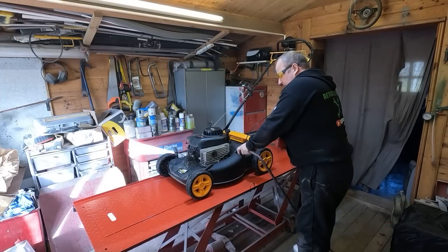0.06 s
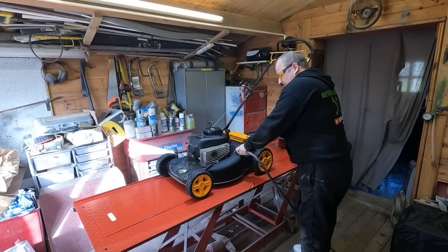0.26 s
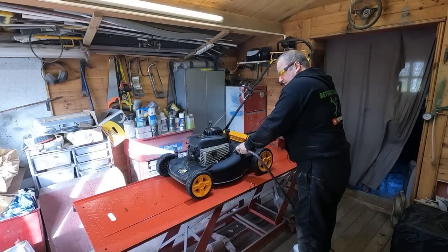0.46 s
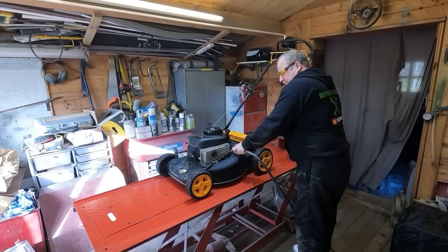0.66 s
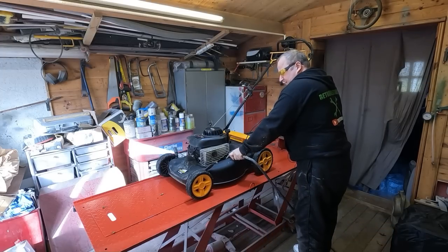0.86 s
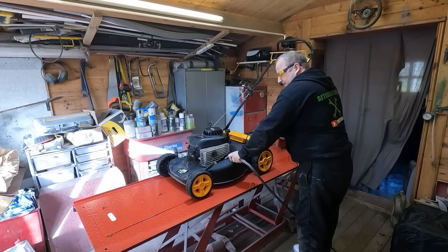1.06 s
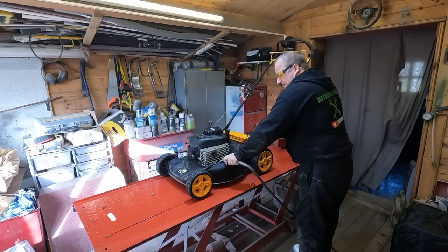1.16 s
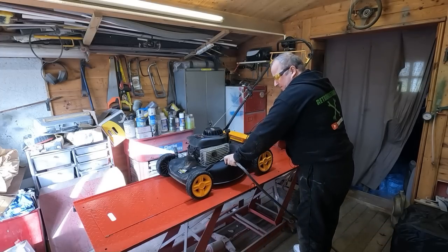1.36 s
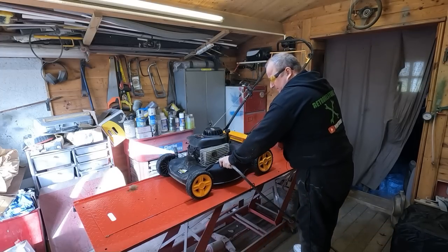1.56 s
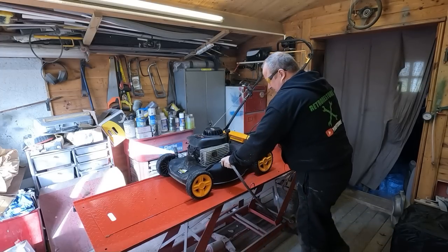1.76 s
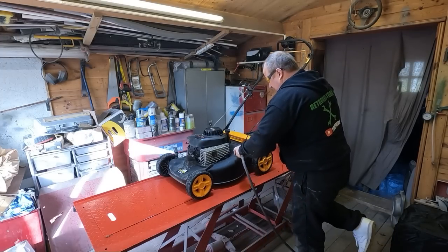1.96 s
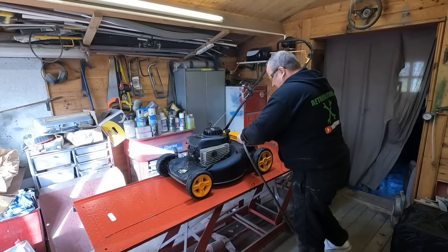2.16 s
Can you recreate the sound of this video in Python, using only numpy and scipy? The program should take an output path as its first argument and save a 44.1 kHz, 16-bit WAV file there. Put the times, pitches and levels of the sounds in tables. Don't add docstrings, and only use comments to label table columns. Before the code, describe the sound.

A compressed-air blow gun in a small wooden workshop, heard from a few metres, nearly mono. Faint room air and a tiny knock, then at 0.2 s a bright hiss bursts open, duller from about 0.7 s, with breathy whistling edges. The nozzle knocks sheet steel sharply near 0.85, 1.08, 1.32 and 1.75 s, scraping between. The blast stops around 1.87 s, leaving a soft fluttering whistle and low hum.

```python
import sys
import numpy as np
from scipy import signal
from scipy.fft import rfft, irfft, next_fast_len
from scipy.io import wavfile
from scipy.ndimage import uniform_filter1d, map_coordinates

SR = 44100
rng = np.random.default_rng(int(sys.argv[2]) if len(sys.argv) > 2 else 0)


def pcm_store(signal):
    levels = np.round(np.clip(np.atleast_2d(signal), -1, 1) * 32767)
    wavfile.write(sys.argv[1], SR, levels.astype(np.int16).T)


def to_linear_factor(level_db):
    exponent = np.asarray(level_db, float) / 20
    return 10 ** exponent


N = 97020


def unit(x):
    return x / np.sqrt(np.mean(x ** 2) + 1e-20)


def along(points, hz):
    f, v = np.transpose(points)
    return np.interp(np.log(hz + 1), np.log(f + 1), v)


def curves(rows):
    s, *cols = np.transpose(rows)
    return [np.interp(np.arange(N) / SR, s, c) for c in cols]


def wobble(rate_hz):
    knots = rng.standard_normal(int(N * rate_hz / SR) + 4)
    return map_coordinates(knots, [np.arange(N) * rate_hz / SR])


def filtered(x, response):
    m = next_fast_len(N + SR // 2)
    return irfft(rfft(x, m) * response(np.fft.rfftfreq(m, 1 / SR)), m)[..., :N]


def resonances(peaks):
    def response(f):
        return sum((-1) ** k * to_linear_factor(db) * 1j * f * w / (c * c - f * f + 1j * f * w)
                   for k, (c, w, db) in enumerate(peaks))
    return response


def patchy(patchy_db, x=None, bins=5, frames=12):
    z = signal.stft(rng.standard_normal(N) if x is None else x, nperseg=512)[2]
    field = uniform_filter1d(rng.standard_normal(z.shape), bins, 0)
    field = uniform_filter1d(field, frames, 1)
    return signal.istft(z * to_linear_factor(patchy_db * unit(field)), nperseg=512)[1][:N]


def whistle(hz, width_hz):
    a, b = filtered(rng.standard_normal((2, N)), lambda f: 1 / (1 + (2 * f / width_hz) ** 2))
    phase = 2 * np.pi * np.cumsum(hz * np.ones(N)) / SR
    return unit(a * np.cos(phase) + b * np.sin(phase))


def room_tone():
    # frequency in Hz, density in dB per Hz
    air_spectrum = [(25, -21), (100, -13.5), (500, -12.5), (2100, -16), (4000, -18.5), (5200, -33),
                    (8600, -23.5), (11500, -39)]
    air_db, hum_hz, hum_width_hz = -52.5, 214, 15
    hum_db, hum_rest_db, hum_on_s, hum_off_s = -57, -9, 0.205, 2.08
    air = unit(filtered(patchy(patchy_db=2.5), lambda f: to_linear_factor(along(air_spectrum, f))))
    drone_db, = curves([(hum_on_s - 0.03, hum_rest_db), (hum_on_s, 0),
                        (hum_off_s, 0), (hum_off_s + 0.05, hum_rest_db)])
    hum = unit(filtered(rng.standard_normal(N), resonances([(hum_hz, hum_width_hz, 0)])))
    return to_linear_factor(air_db) * air + to_linear_factor(hum_db + drone_db) * hum


def walls(x):
    # frequency in Hz, t60 in s
    decay = [(200, 0.39), (2000, 0.38), (10000, 0.13)]
    delay = 350
    out, hop = np.zeros(N + 2 * SR), SR // 5
    padded = np.pad(x, (hop, 2 * hop))
    for start in range(-hop, N, hop):
        hz, t, z = signal.stft(rng.standard_normal(SR // 2), SR, nperseg=256)
        tail = signal.istft(z * to_linear_factor(-60 * t / along(decay, hz)[:, None]), SR, nperseg=256)[1]
        piece = padded[start + hop:][:2 * hop] * np.hanning(2 * hop)
        echo = signal.fftconvolve(piece, tail / np.linalg.norm(tail))
        out[start + hop + delay:][:len(echo)] += echo
    return out[hop:][:N]


def drags():
    # start in s, length in s, level in dB
    strokes = [
        (0.652, 0.2, -42.5),
        (1.099, 0.17, -35),
        (1.418, 0.27, -31.5),
        (1.75, 0.13, -38),
    ]
    # frequency in Hz, width in Hz, level in dB
    panel = [(530, 75, -7), (822, 133, -0.5), (1104, 130, 3), (1387, 120, -4.5), (2010, 260, -5.5),
             (3000, 1000, -11.5)]
    rise_s, fall_s, grains_per_s, grain_spread_db = 0.023, 0.035, 2500, 1.5
    t = np.arange(N) / SR
    hits = rng.random(N) < grains_per_s / SR
    grains = hits * rng.uniform(-0.82, 1, N) * to_linear_factor(grain_spread_db * rng.standard_normal(N))
    stroke = sum(to_linear_factor(db) * np.clip((t - s) / rise_s, 0, 1) * np.clip((s + length - t) / fall_s, 0, 1)
                 for s, length, db in strokes)
    return stroke * to_linear_factor(0.95 * wobble(20)) * unit(filtered(grains, resonances(panel)))


def knocks():
    # start in s, peak in dB, blow frequency in Hz, blow t60 in s
    bumps = [(.001, -40, 808, 0.026), (.006, -40, 520, 0.032), (.014, -41, 750, 0.028),
             (.024, -42.5, 423, .03), (.848, -12.5, 643, 0.017), (.853, -28, 530, 0.018),
             (.860, -22.5, 1250, 0.025), (.864, -25, 560, 0.016), (.877, -27, 780, .03),
             (.898, -27, 790, .015), (1.0775, -22, 597, 0.023), (1.0857, -19.5, 1150, .016),
             (1.096, -31, 1056, 0.042), (1.111, -28, 930, 0.011), (1.3214, -17.5, 746, 0.015),
             (1.3294, -20.5, 1117, 0.021), (1.343, -23, 1037, 0.017), (1.3475, -24, 906, 0.019),
             (1.352, -34, 524, .015), (1.428, -29, 1130, 0.022), (1.749, -23, 645, 0.019),
             (1.757, -25.5, 1057, 0.024), (1.717, -28, 2250, .015)]
    # frequency in Hz, width in Hz, level in dB
    deck = [(433, 710, -2.5), (560, 38, 7.5), (810, 1100, -7.5), (1100, 560, 0.5), (1250, 100, 1.5),
            (2230, 1800, -9.5), (5000, 2000, -11.5)]
    rattle_db, rattle_t60_s, contact_s = -13.5, 0.11, 0.0016
    crack_db, crack_t60_s = -13.5, 0.018
    deck_low_hz = 322
    out, t = np.zeros(N + SR), np.arange(SR // 4) / SR
    shake = unit(filtered(rng.standard_normal(N), resonances(deck)))
    snap = unit(filtered(rng.standard_normal(N), resonances([(2300, 1500, 0), (5000, 2500, -4)])))
    for s, db, hz, t60_s in bumps:
        at = round(s * SR)
        cycles = sum(gain * np.sin(2 * np.pi * ratio * hz * t)
                     for ratio, gain in ((1, 1), (0.818, 0.59), (1.395, 0.44)))
        blow = -2.4 * to_linear_factor(-60 * t / t60_s) * cycles
        crack = to_linear_factor(crack_db - 60 * t / crack_t60_s) * np.roll(snap, -at)[:len(t)]
        rattle = to_linear_factor(rattle_db - 60 * t / rattle_t60_s) * np.roll(shake, -at)[:len(t)]
        onset = 1 - np.exp(-t / contact_s)
        out[at:][:len(t)] += to_linear_factor(db) * ((blow + rattle) * onset + crack)
    return filtered(out[:N], lambda f: (1j * f / (deck_low_hz + 1j * f)) ** 2)


def leak():
    # time in s, level in dB, whistle dropping to the gun body 0-1, lowest tube mode in dB
    flow = [(1.84, -70, 0.1, 3), (1.875, -46.5, 0, 2), (1.945, -43.5, 0.15, 6.5), (1.99, -50, 0.08, 2),
            (2.02, -43, 0.35, -20), (2.045, -45, 0.3, 0), (2.1, -44, 0.55, 3), (2.135, -41.5, 0.85, -1.5),
            (2.2, -45.5, 0.85, -1.5)]
    # frequency in Hz, width in Hz, level in dB
    tube_modes = [(3060, 220, -2.5), (5190, 160, -2), (7110, 220, -3.5), (8600, 490, -13.5),
                  (9700, 470, -20.5)]
    # time in s, tube pitch shift as a share
    pitch_drift = [(1.87, -0.033), (1.95, 0.011), (2.01, 0.003), (2.07, -0.012), (2.13, 0.0041),
                   (2.2, 0.014)]
    # frequency in Hz, width in Hz, level in dB
    body_low = [(691, 35, 11), (1470, 56, -5)]
    body_high = [(1720, 52, 6), (760, 440, -3.5)]
    shut_s, thump_hz, thump_db, thump_t60_s = 1.862, 54.7, -42, 0.11
    level_db, low, lowest_db = curves(flow)
    low = np.clip(low, 0, 1)
    drift, = curves(pitch_drift)

    tones = []
    for hz, width_hz, db in tube_modes:
        flutter = to_linear_factor(db + 4.6 * np.minimum(wobble(40), 0))
        tones.append(flutter * whistle(hz * (1 + drift + 0.0031 * wobble(40)), width_hz))
    tube = to_linear_factor(lowest_db) * tones[0] + sum(tones[1:])
    breath = unit(filtered(patchy(patchy_db=1.0), lambda f: np.abs(resonances(tube_modes[1:])(f)) ** 0.88))
    high = unit(filtered(rng.standard_normal(N), resonances(body_high)))
    deep = unit(filtered(rng.standard_normal(N), resonances(body_low)))
    voices = 0.7 * tube + 0.47 * breath + 1.29 * (1 - low) ** 3 * high + 0.72 * low ** 2 * deep

    t = np.maximum(np.arange(N) / SR - shut_s, 0)
    thump = to_linear_factor(thump_db - 60 * t / thump_t60_s) * np.sin(2 * np.pi * thump_hz * t)
    return to_linear_factor(level_db + 1.5 * wobble(29.97)) * voices + thump


def edges():
    # start in s, length in s, first and last pitch in Hz, level in dB
    tones = [(-.03, 0.27, 3230, 3710, -60), (.05, .14, 4300, 4550, -64.5), (0.183, 0.033, 7000, 6950, -56),
             (.185, 0.023, 5140, 5100, -55), (0.194, 0.038, 800, 880, -42.5),
             (0.196, 0.047, 1500, 1720, -50), (0.211, 0.097, 6800, 6800, -36.5),
             (.205, 0.099, 5200, 5500, -40), (0.203, .06, 9330, 9200, -50), (0.293, 0.047, 2450, 2484, -38),
             (.28, 0.23, 1001, 1100, -44.5), (0.221, .055, 4610, 4734, -31.5),
             (0.221, 0.086, 1906, 1750, -35.5), (0.221, 0.069, 1150, 1209, -38.5),
             (0.218, 0.075, 2350, 2300, -39), (.3, .4, 4500, 4197, -44), (.32, .14, 5620, 5600, -39.5),
             (.48, 0.19, 6420, 6700, -42.5), (0.641, .07, 2300, 2200, -40), (1.432, .045, 4750, 4760, -38),
             (1.828, 0.054, 2706, 2693, -40), (1.83, 0.059, 2246, 2246, -38),
             (0.877, 0.13, 4700, 5240, -42.5), (.97, 0.38, 11560, 11900, -42.5),
             (1.09, .11, 5020, 5280, -39.5), (1.117, 0.067, 9200, 9300, -42.5),
             (1.097, 0.2, 14400, 14700, -47), (1.336, 0.13, 11820, 11720, -40),
             (1.377, 0.12, 4600, 4740, -40.5), (1.451, 0.24, 2050, 2256, -40), (1.47, .16, 6600, 7180, -44),
             (1.58, 0.11, 4120, 4500, -40), (1.598, 0.11, 4500, 4930, -41),
             (1.644, 0.24, 4795, 5000, -41.5), (1.72, 0.11, 12140, 11960, -42.5),
             (1.804, 0.073, 7000, 7050, -39), (1.717, 0.067, 2900, 3000, -38.5)]
    q, fade_s = 11.5, 0.02
    t = np.arange(N) / SR
    out = np.zeros(N)
    for s, length, hz0, hz1, db in tones:
        swell = np.clip(np.minimum(t - s, s + length - t) / fade_s, 0, 1)
        out += to_linear_factor(db) * swell * whistle(np.interp(t, [s, s + length], [hz0, hz1]), hz0 / q)
    return out


def jet():
    # time in s, flow in dB, jet tucked under the deck 0-1
    flow = [(.19, -56.5, 0), (.215, -43, 1), (.242, -26, 0.26), (.31, -30, 0), (.6, -29.5, 0.13),
            (.7, -28, 0.4), (.74, -30, 1), (1.03, -32, 0.6), (1.14, -31, 0.56), (1.29, -31.5, 0.58),
            (1.42, -30.5, 0.7), (1.62, -31.5, 0.57), (1.72, -32.5, 0.73), (1.858, -28.5, 0.5),
            (1.872, -39.5, 0.9), (1.95, -56.5, 0.7)]
    # frequency in Hz, density in dB per Hz
    open_jet = [(80, -16.5), (210, -14.5), (900, -2.5), (2200, 0), (3860, -4.5), (6560, -1.5), (8200, -12),
                (15800, -19)]
    tucked_jet = [(80, -17), (190, -9.5), (2130, 0.5), (3940, -7.5), (5190, -8), (7940, -16), (11900, -16),
                  (15800, -21)]
    # frequency in Hz, width in Hz, lift in dB
    nozzle = [(3680, 1200, -0.5), (4500, 800, 0.5), (7350, 820, 3), (9200, 1230, 5), (11820, 990, 6.5),
              (14400, 900, 7.5)]
    treble_hz, thin_flow_db, treble_loss = 8400, -38, 0.7
    opens_s, opens_over_s = 0.214, 0.006
    flow_db, tucked = curves(flow)
    tucked = np.clip(tucked, 0, 1)

    def hiss_through(spectrum):
        def response(f):
            lift_db = sum(db / (1 + (2 * (f - c) / w) ** 2) for c, w, db in nozzle)
            return to_linear_factor(along(spectrum, f)) * to_linear_factor(lift_db)
        return unit(filtered(patchy(patchy_db=2.0), response))

    hiss = np.sqrt(1 - tucked) * hiss_through(open_jet) + np.sqrt(tucked) * hiss_through(tucked_jet)
    treble = filtered(hiss, lambda f: 1 / (1 + (treble_hz / (f + 1)) ** 6))
    opened = np.clip((np.arange(N) / SR - opens_s) / opens_over_s, 0, 1)
    treble_gain = opened * to_linear_factor(treble_loss * np.minimum(flow_db - thin_flow_db, 0))
    hiss = hiss - treble * (1 - treble_gain)
    return to_linear_factor(flow_db + 0.56 * wobble(6.72) + 0.63 * wobble(59.7)) * hiss


def scene():
    # frequency in Hz, side under mid in dB
    side_db = [(60, -29), (250, -37.5), (700, -38.5), (1500, -44), (4400, -34), (8000, -28), (15000, -23)]
    # time in s, half length in s, side lift in dB
    widenings = [
        (.23, 0.075, 16),
        (0.622, 0.038, 18),
        (1.81, 0.032, 18),
        (1.943, 0.023, 14),
    ]
    walls_db = -10
    near = jet() + edges() + leak() + knocks() + drags()
    mid = near + to_linear_factor(walls_db) * walls(near) + room_tone()
    apart = filtered(walls(near) + room_tone(), lambda f: to_linear_factor(along(side_db, f) - 8.0))
    t = np.arange(N) / SR
    widening_db = sum(db * np.exp(-((t - s) / half_s) ** 4) for s, half_s, db in widenings)
    side = to_linear_factor(widening_db - 1.5) * patchy(patchy_db=8.5, x=apart, bins=18, frames=5)
    return np.array([mid + side, mid - side])


def band_limit(x):
    return signal.sosfilt(signal.butter(12, 16170, fs=SR, output="sos"), x)


def record(dry):
    top_hz = 15800
    return band_limit(filtered(dry, lambda f: f < top_hz))


dry = scene()
out = record(dry)
pcm_store(out)
```